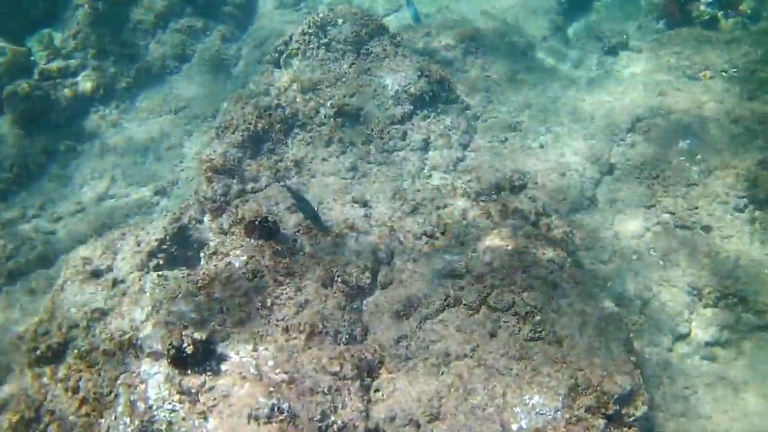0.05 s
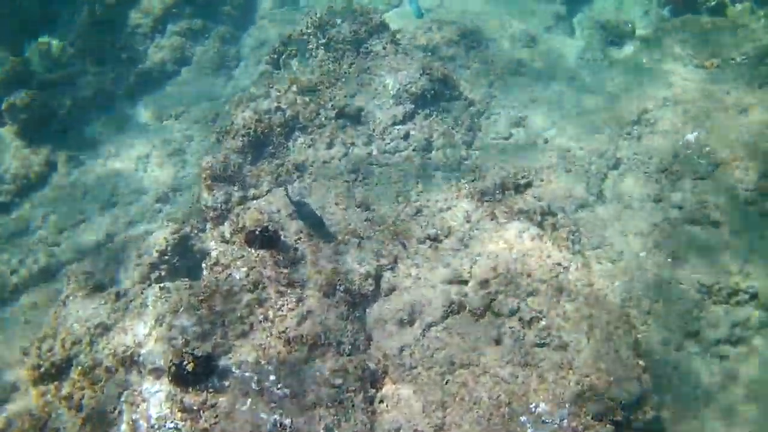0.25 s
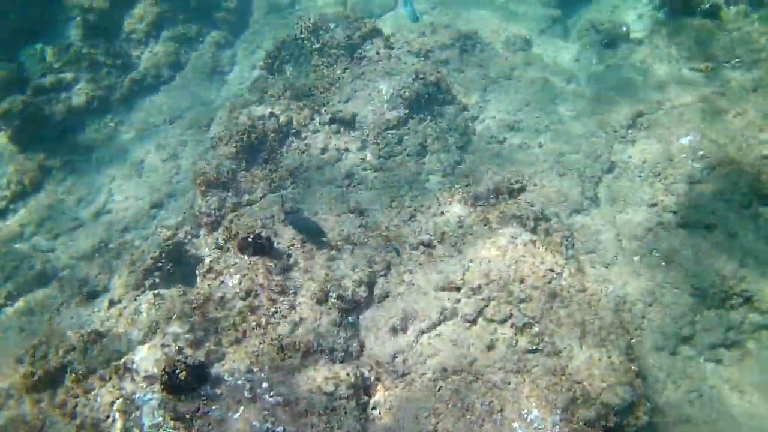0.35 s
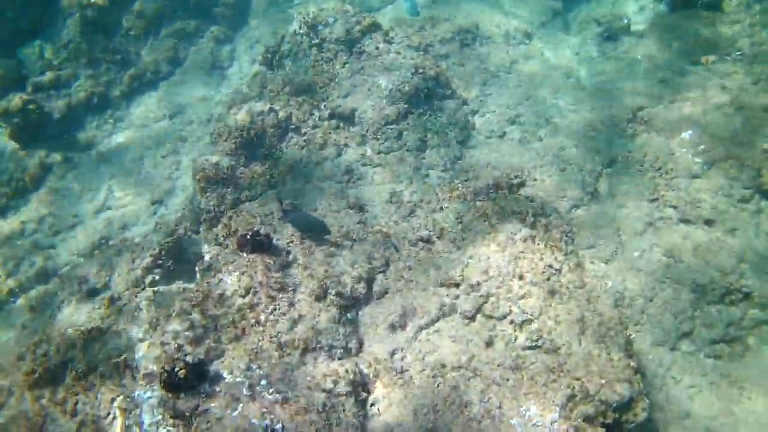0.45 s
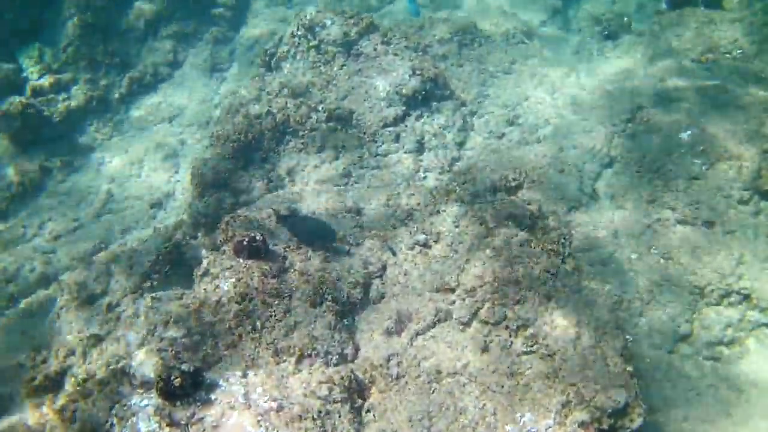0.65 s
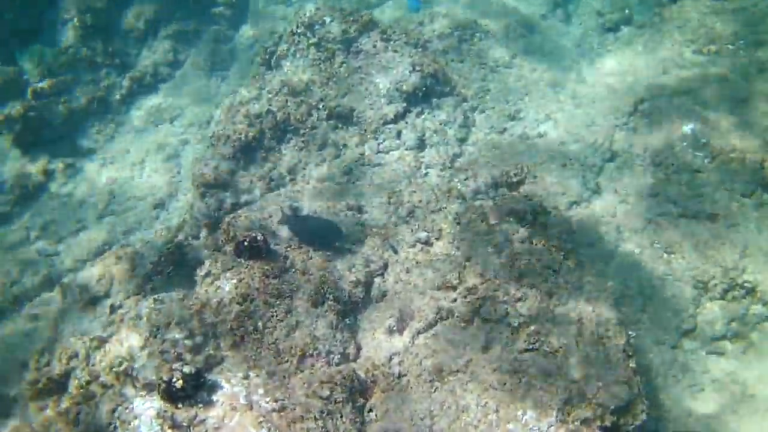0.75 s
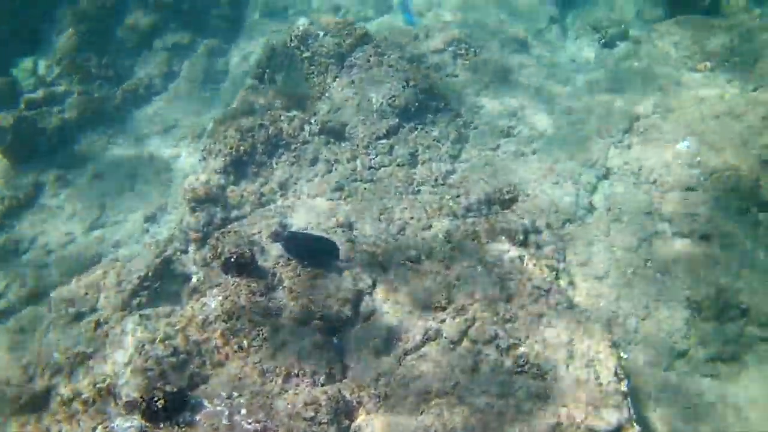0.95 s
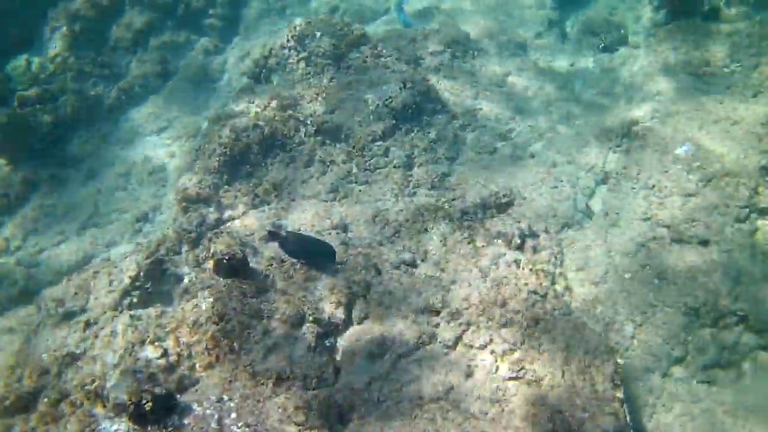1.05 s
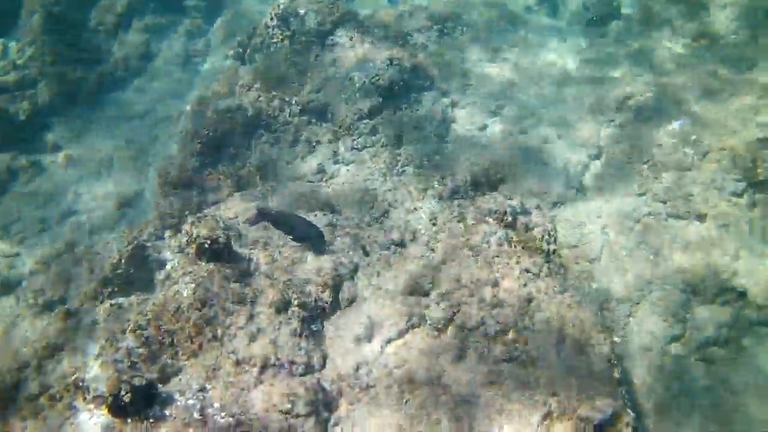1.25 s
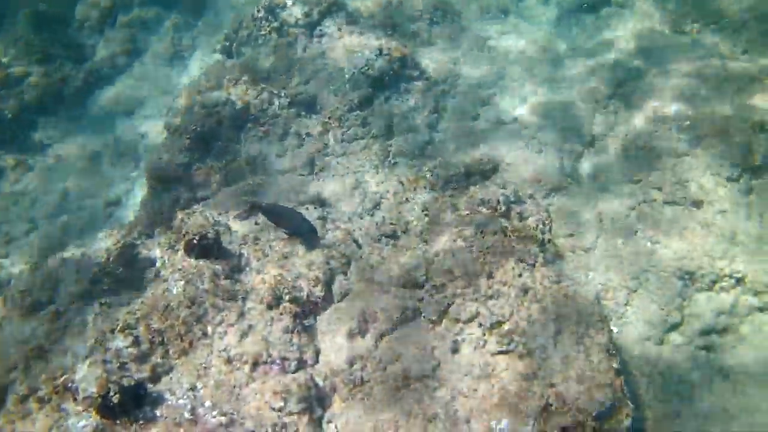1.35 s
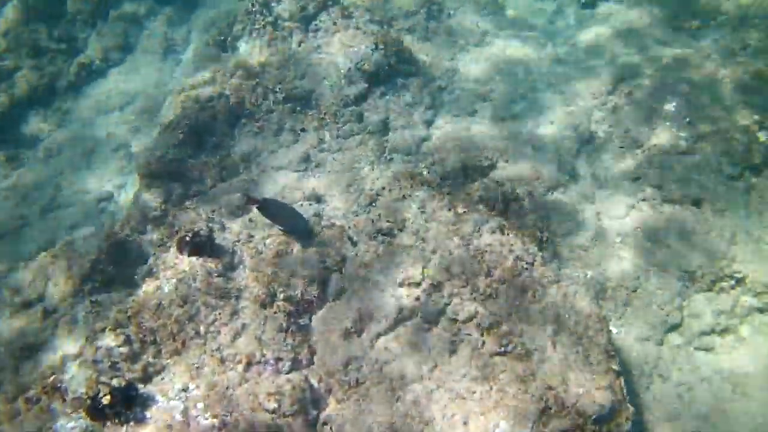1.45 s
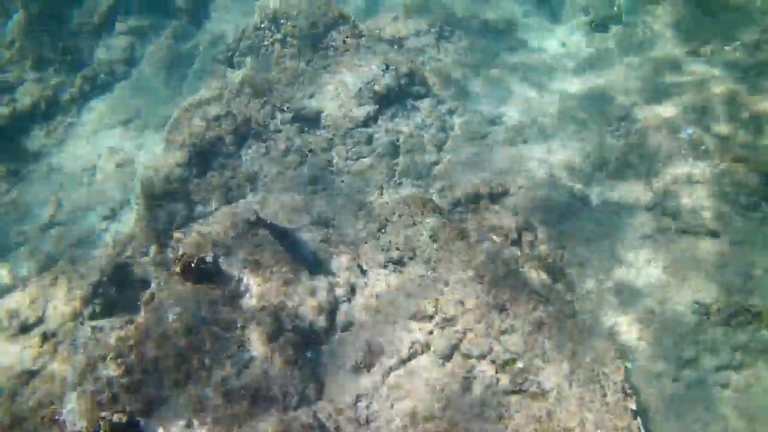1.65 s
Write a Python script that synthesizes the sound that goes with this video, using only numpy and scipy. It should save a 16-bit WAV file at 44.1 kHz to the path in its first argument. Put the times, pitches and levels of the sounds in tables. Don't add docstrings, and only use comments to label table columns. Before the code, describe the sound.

A distant whale moan, almost a pure tone, starts near 0.35 s, leaps upward, arches to about 0.6, sinks by 0.93, then climbs again, fading near 1.55. Before it, short low fish grunts cluster. A rapid drumming knock run comes at 0.65-0.73. Shrimp snap throughout, sharpest near 0.3 and 0.5, over faint far crackle and steady muffled water murmur with hollow housing resonance and soft reef echo.

```python
import sys
import numpy as np
from scipy import signal
from scipy.io import wavfile
from scipy.ndimage import uniform_filter1d

SR = 44100
rng = np.random.default_rng(int(sys.argv[2]) if len(sys.argv) > 2 else 0)


def store_pcm(level_fs):
    pcm = np.round(np.clip(level_fs, -1, 1) * 32767).astype(np.int16)
    wavfile.write(sys.argv[1], SR, np.atleast_2d(pcm).T)


def attenuation_scalar(level_db):
    decades = np.asarray(level_db, float) / 20
    return 10 ** decades


N = 74970


def rms_one(x):
    return x / np.sqrt(np.mean(x ** 2) + 1e-20)


def at_hz(points, hz):
    points_hz, points_db = np.transpose(points)
    return np.interp(np.log(hz), np.log(points_hz), points_db)


def drift(rate_hz):
    r = np.exp(-80 * np.pi * rate_hz / SR)
    noise = rng.standard_normal(N // 40 + 2002)
    slow = rms_one(signal.lfilter([1], [1, -2 * r, r * r], noise)[2000:])
    return np.interp(np.arange(N) / 40, np.arange(len(slow)), slow)


def band(x, low_hz, high_hz):
    return signal.sosfilt(signal.butter(2, [low_hz, high_hz], "band", fs=SR, output="sos"), x + 1e-18)


def ring(x, hz, width_hz):
    r = np.exp(-np.pi * width_hz / SR)
    zeros = np.array([1, 0, -1]) * (1 - r * r) / 2
    return signal.lfilter(zeros, [1, -2 * r * np.cos(2 * np.pi * hz / SR), r * r], x + 1e-18)


ECHO_T60_S, ECHO_DB = 0.75, -22


def sea_echo(x):
    t = np.arange(SR // 2) / SR
    tail = rng.standard_normal(len(t)) * attenuation_scalar(-60 * t / ECHO_T60_S)
    return attenuation_scalar(ECHO_DB) * signal.fftconvolve(x, tail / np.linalg.norm(tail))[:N]


# [t/s, f/Hz]
MOAN = [(.36, 395), (.424, 445), (.454, 592), (.482, 636), (.52, 663), (.58, 673), (.65, 660), (.72, 625),
        (.76, 587), (.86, 424), (.93, 366), (1.02, 387), (1.062, 420), (1.08, 468), (1.2, 541), (1.31, 592),
        (1.45, 633), (1.54, 690)]
# [t/s, level/dB]
EFFORT = [(.34, -7.5), (.42, -4.5), (.433, 1.5), (.445, 1.5), (.46, 0.5), (.495, 0), (.51, -1.5), (.75, -1),
          (.77, -1), (.9, -4.5), (1.04, 3.5), (1.068, -3), (1.085, 0.5), (1.2, -4), (1.3, -7.5),
          (1.41, -10.5), (1.48, -18), (1.56, -31)]
# [f/Hz, level/dB]
PATH = [(372, -48.5), (430, -47.5), (470, -36), (508, -34), (546, -36.5), (595, -29.5), (628, -28.5),
        (672, -35)]
# [f/Hz, width/Hz, level/dB]
RINGS = [(490, 14, -7), (599.6, 21, -11.5)]
OVERTONE_DB, OVERTONE_HZ, OVERTONE_WIDTH_HZ = -63, 674, 40
WAVER_DB, GLIDE_S = .5, .016


def whale():
    t = np.arange(N) / SR
    pitch_hz = uniform_filter1d(np.interp(t, *np.transpose(MOAN)), int(GLIDE_S * SR))
    phase = 2 * np.pi * np.cumsum(pitch_hz) / SR
    effort_db = np.interp(t, *np.transpose(EFFORT), left=-90, right=-90) + WAVER_DB * drift(25)
    octave = attenuation_scalar(OVERTONE_DB) * np.exp(-((pitch_hz - OVERTONE_HZ) / OVERTONE_WIDTH_HZ) ** 2)
    tones = attenuation_scalar(at_hz(PATH, pitch_hz)) * np.sin(phase) + octave * np.sin(2 * phase)
    voice = np.sqrt(2) * attenuation_scalar(effort_db) * tones
    rings = sum(attenuation_scalar(db) * ring(voice, hz, width_hz) for hz, width_hz, db in RINGS)
    return voice + sea_echo(voice) + rings


# [t/s, peak level/dB, f/Hz, length/s]
GRUNTS = [(.002, -58.5, 612, 0.1), (.056, -45, 487, 0.037), (0.093, -42, 885, 0.018),
          (0.109, -44.5, 805, 0.017), (.128, -45.5, 484, 0.021), (0.153, -40, 70, 0.046),
          (.001, -49, 75, 0.022), (.235, -47, 504, 0.013), (0.179, -53, 480, 0.0065),
          (.192, -47, 455, 0.016), (0.209, -39, 404.6, 0.0366), (0.271, -54.5, 398, 0.026),
          (0.321, -46.5, 462, .022), (.36, -43.5, 786, 0.014), (0.361, -49.5, 506, 0.024),
          (0.438, -52, 1716, 0.037), (0.517, -45.5, 213, 0.01), (.955, -48, 510, 0.011),
          (1.256, -56, 1673, 0.042), (1.542, -51, 424, .03), (0.212, -52, 70, 0.026),
          (0.549, -51.5, 70, 0.062), (0.842, -50, 807, 0.016), (1.27, -46, 271, .03),
          (1.323, -50, 790, 0.011), (1.35, -52.5, 70, 0.061), (1.5, -51, 163, 0.021),
          (1.572, -50, 490, 0.022)]
GRUNT_EDGE_S, GRUNT_ROUGH_DB, GRUNT_SAG_DB = 0.0016, 1, -2.5


def grunts():
    t, out = np.arange(N) / SR, np.zeros(N)
    rough = attenuation_scalar(GRUNT_ROUGH_DB * drift(86))
    for s, db, hz, length_s in GRUNTS:
        edges = np.clip(np.minimum(t - s, (s + length_s - t) / 3) / GRUNT_EDGE_S, 0, 1)
        sag = attenuation_scalar(GRUNT_SAG_DB * np.clip((t - s) / length_s, 0, 1))
        out += attenuation_scalar(db) * edges * sag * rough * np.sin(2 * np.pi * hz * (t - s))
    return out


# [t/s, peak level/dB, f/Hz]
KNOCKS = [
    (.652, -36, 370),
    (0.67, -34, 378),
    (.681, -29.5, 408),
    (0.694, -38, 310),
    (0.702, -51, 380),
    (0.711, -30.5, 396),
    (0.721, -30, 436),
    (0.728, -40, 450),
]
KNOCK_S = 0.01


def knocks():
    t, out = np.arange(N) / SR, np.zeros(N)
    for s, db, hz in KNOCKS:
        shape = np.sin(np.pi * np.clip((t - s) / KNOCK_S, 0, 1)) ** 2
        out += attenuation_scalar(db) * shape * np.sin(2 * np.pi * hz * (t - s))
    return out


# [t/s, peak level/dB, centre f/Hz, spread/octaves]
SNAPS = [(0.093, -59, 5000, 1.), (.122, -55, 4000, 0.77), (0.1517, -44.5, 3460, 0.36),
         (0.1753, -48.5, 5230, 0.52), (0.2188, -48, 3240, 0.7), (0.2973, -37.5, 2000, 0.61),
         (0.3663, -48.5, 3460, 0.67), (0.476, -45, 3200, .4), (0.4943, -30, 2350, 0.82),
         (0.6093, -56.5, 3900, 0.57), (0.6528, -55, 5360, .8), (.706, -53.5, 8080, 1.1),
         (0.7546, -47, 4270, 1), (0.8351, -48, 6000, 0.74), (1.0431, -41.5, 4050, 0.58),
         (1.0508, -46.5, 3500, 0.4), (1.1055, -57, 3200, 0.37), (1.1497, -47.5, 5370, 0.57),
         (1.2077, -58, 4570, 0.65), (1.2386, -45, 1590, .15), (1.262, -51.5, 3940, 0.88),
         (1.3524, -57, 2270, 0.13), (1.3943, -49.5, 2040, 0.28), (1.426, -44.5, 5300, .7),
         (1.449, -66, 5000, .8), (1.5174, -48.5, 3580, 0.45), (1.615, -53, 3200, 0.19)]
# [low f/Hz, high f/Hz]
SNAP_BANDS_HZ = [(1450, 1950), (1950, 2700), (2700, 3700), (3700, 5200), (5200, 7700), (8700, 12000)]
SNAP_DB, SNAP_ECHO_T60_S, SNAP_ECHOES_PER_S, SNAP_HOLD_S = -1, 0.012, 2300, .0035
SNAP_TAIL_DB, SNAP_TAIL_T60_S = -25, .16
SNAP_COLOUR_DB, SNAP_TOP_DB = 3, -3


def snaps():
    out, t = np.zeros(N + SR), np.arange(SR // 10) / SR
    draws = rng.random((len(SNAPS), 2, len(t)))
    centres_hz = np.sqrt(np.prod(SNAP_BANDS_HZ, axis=1))
    for (s, db, hz, octaves), (when, size) in zip(SNAPS, draws):
        noise = 2 * size - 1
        hit = (when < SNAP_ECHOES_PER_S / SR) | (t == 0)
        decay = attenuation_scalar(-60 * np.maximum(t - SNAP_HOLD_S, 0) / SNAP_ECHO_T60_S)
        train = hit * np.where(t > 0, noise, .6) * decay
        train = train + attenuation_scalar(SNAP_TAIL_DB) * noise * attenuation_scalar(-60 * t / SNAP_TAIL_T60_S)
        colour_db = SNAP_COLOUR_DB * (2 * when[-6:] - 1) + SNAP_TOP_DB * (centres_hz > 8000)
        gains = np.exp(-(np.log2(centres_hz / hz) / octaves) ** 2 / 2) * attenuation_scalar(colour_db)
        burst = sum(g * band(band(train, *edges), *edges) for g, edges in zip(gains, SNAP_BANDS_HZ))
        i = int(s * SR)
        out[i:i + len(t)] += attenuation_scalar(db + SNAP_DB) * burst / np.abs(burst).max()
    return out[:N]


# [f/Hz, level/dB]
CRACKLE = [(1500, -4.5), (3000, 4), (6000, -31), (8000, -13.5), (12000, -23)]
CRACKLES_PER_S, CRACKLE_DB, CRACKLE_SPREAD_DB = 400, -75, 3


def crackle():
    sizes = attenuation_scalar(CRACKLE_SPREAD_DB * np.minimum(rng.exponential(1, N), 4)) * rng.choice([-1, 1], N)
    clicks = sizes * (rng.random(N) < CRACKLES_PER_S / SR)
    dealt = rng.integers(0, 8, N)
    out = np.zeros(N)
    for k, hz in enumerate(np.geomspace(1600, 9000, 8)):
        out += attenuation_scalar(at_hz(CRACKLE, hz)) * band(clicks * (dealt == k), hz / 1.24, hz * 1.66)
    return attenuation_scalar(CRACKLE_DB) * rms_one(out)


# [f/Hz, level/dB]
WATER = [(20, 5.5), (70, -7.5), (200, -7), (480, -8.5), (1200, -18.5), (7300, -31), (8200, -33.5),
         (15000, -33.5)]
WATER_DB, WATER_PATCHY_DB = -57.5, 1.38


def water():
    out, together = 0, drift(3)
    edges_hz = 18 * 2 ** np.arange(0, 10.1, .5)
    white = rng.standard_normal((2, N + SR // 2))
    for k, (low, high) in enumerate(zip(edges_hz, edges_hz[1:])):
        depth_db = WATER_PATCHY_DB * np.clip(np.log2(9000 / low), .8, 2)
        gain_db = at_hz(WATER, np.sqrt(low * high)) + depth_db * (.3 * together + drift(15))
        out = out + attenuation_scalar(gain_db) * band(white[k % 2], low, high)[-N:]
    return attenuation_scalar(WATER_DB) * rms_one(out)


# [f/Hz, width/Hz, rms level/dB, flicker/dB]
HOUSING = [(70, 14, -64, 3), (473, 200, -57.5, 1.5), (839, 112, -68.5, 1.5), (1717, 200, -68.5, 4.75),
           (2130, 220, -79.5, 5), (3200, 380, -78, 4), (6840, 510, -82, 4)]


def housing():
    out = np.zeros(N)
    for hz, width_hz, db, flicker_db in HOUSING:
        level = attenuation_scalar(db + flicker_db * drift(30))
        noise = rng.standard_normal(N + SR // 2)
        out += level * rms_one(band(noise, hz - width_hz / 2, hz + width_hz / 2)[-N:])
    return out


def scene():
    return (whale() + grunts() + knocks() + snaps() + crackle() + water() + housing())[None]


def roll_off(x):
    return signal.sosfilt(signal.butter(12, 15490, fs=SR, output="sos"), x)


def record(dry):
    cut = signal.sosfilt(signal.ellip(12, .3, 70, 15050, fs=SR, output="sos"), dry)
    return roll_off(cut)


dry = scene()
out = record(dry)
store_pcm(out)
```